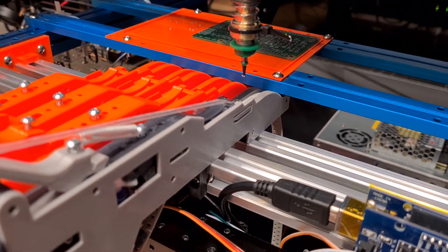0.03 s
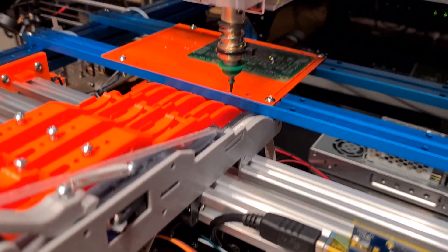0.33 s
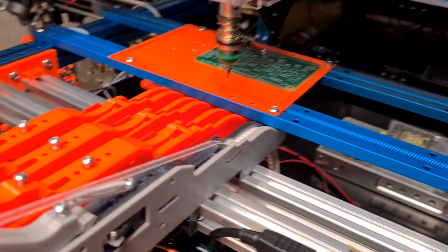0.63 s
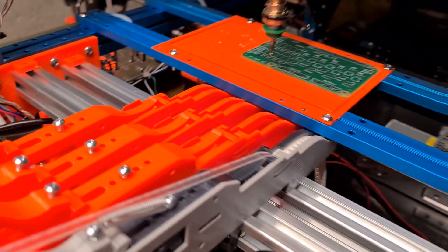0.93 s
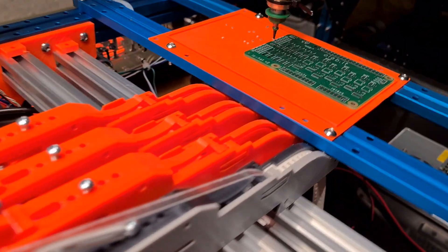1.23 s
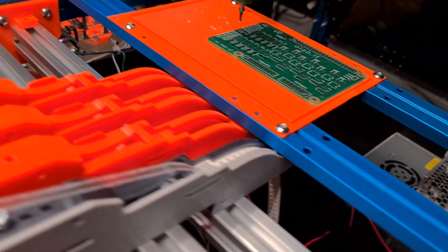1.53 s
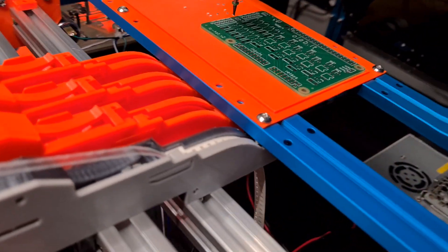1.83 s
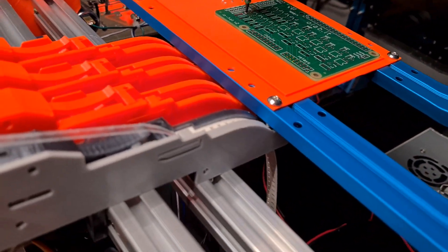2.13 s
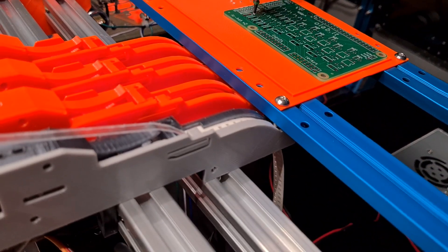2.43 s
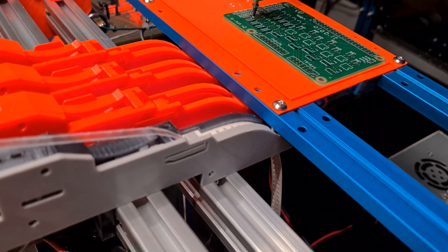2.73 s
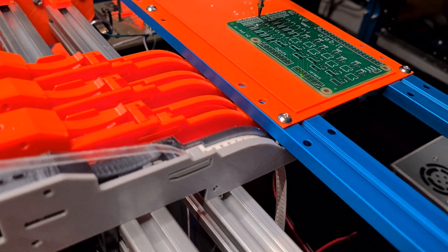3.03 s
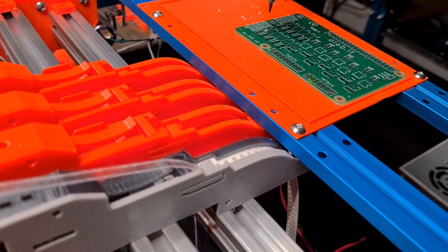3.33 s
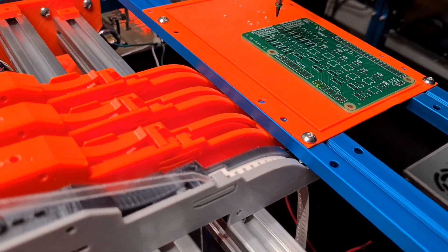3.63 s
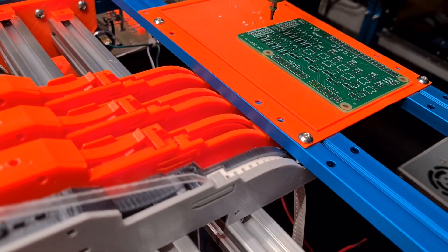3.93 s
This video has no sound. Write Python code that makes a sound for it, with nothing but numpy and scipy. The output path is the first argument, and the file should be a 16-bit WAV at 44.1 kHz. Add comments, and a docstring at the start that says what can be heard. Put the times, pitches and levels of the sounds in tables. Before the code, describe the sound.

Close up in a small room, a machine's vacuum pump runs with a low rattling buzz while a motor glides underneath. The pump suddenly stalls; fans hum softly, and a small drive rasps, whines and clicks.

```python
"""In a small room, a homemade pick-and-place machine is working close by.
Its vacuum pump thumps, rattles and puffs air with every stroke, then stalls and rocks on its mount.
A stepper motor glides the gantry (the moving bridge) along its rails. Twice, the gears of a small drive
on the head rasp and end in a click. Cooling fans hum underneath."""
import sys
import numpy as np
from scipy import signal
from scipy.fft import rfft, irfft
from scipy.io import wavfile

SR = 44100
rng = np.random.default_rng(int(sys.argv[2]) if len(sys.argv) > 2 else 0)


def int16_out(signal):
    """Quantize to a 16-bit WAV file."""
    q = np.round(np.clip(np.atleast_2d(signal).T, -1, 1) * 32767)
    wavfile.write(sys.argv[1], SR, q.astype(np.int16))


N = 176400
T = np.arange(N) / SR

# Each row: time in seconds, pump strokes per second.
PUMP_SPEED = [(0, 57.5), (.7, 57.63), (1.2, 57.68), (2.35, 57.66)]
# Each row: time in seconds, then thump, rattle and air levels in dB.
PUMP_LEVELS = [(0, -2.3, -1, -2), (.7, -2, -1, -3), (1.25, -1, -.5, -2), (1.6, 0, 0, -.5), (2.3, 0, 0, 0)]
# The pump stalls. Each row: time in seconds, thump level in dB, rattle and air level in dB.
LAST_STROKES = [(2.3626, -1, 1), (2.378, -14, -2), (2.3905, -4, -10), (2.4512, -13.5, -26)]
# Each row: multiple of the stroke rate, level in dB.
THUMP_COLOUR = [(1, -3), (2, -6), (3, -5), (4, -19), (5, -4), (6, -3), (7, -4), (8, -2), (9, -1), (10, -8),
                (11, -1), (12, 0), (13, -4), (14, -6), (15, -4), (16, -18), (17, -21), (18, -29), (19, -28)]
# Each row: pitch in Hz, dB before and dB after the listener moves, seconds to fade by 60 dB.
CASING_RINGS = [(1157, -6, -1, .08), (1212, -5, -5, .07), (1386, -2, -3, .08), (1499, 4, -9, .08),
                (1557, -7, -6, .07), (1789, -5, 0, .09), (1845, -9, -9, .06), (2019, -8, -1, .09),
                (2075, -8, -9, .06), (2249, -12, -7, .07), (2480, -14, -10, .05), (2940, -10, -6, .05),
                (3228, -10, -6, .06)]
# Each row: frequency in Hz, level of the puffed air in dB.
AIR_COLOUR = [(100, -9), (250, 0), (400, 8), (550, 7), (800, 10), (1000, -5), (1400, 1), (2000, 1),
              (2700, -3), (3300, 1.5), (4500, 1), (5100, -2), (6100, 4), (7300, -3), (8600, -12),
              (10000, -6), (11600, -2), (13500, -5), (15100, -1), (16000, -4)]
# Each row: start and end in seconds, level in dB, left minus right in dB.
GEAR_RUNS = [(-.06, .103, -21, -2), (3.503, 3.654, -22.3, -1.5)]
# The gears' first and second run. Each row: frequency in Hz, level in dB.
FIRST_RASP_COLOUR = [(400, -29), (1500, -16), (2600, -10), (3000, 4), (3250, 7), (3850, -2), (4300, 2),
                     (5000, -5), (6700, 3), (8200, -6), (10200, -2), (11500, -4), (14000, -3), (15800, -7)]
SECOND_RASP_COLOUR = [(150, -40), (400, -27), (900, -28), (1500, -21), (1900, -14), (2300, -14), (2700, -9),
                      (3050, 2), (3450, -3), (4000, -2.5), (5200, -5), (5950, 3), (6500, -2), (7400, -2),
                      (8200, -7), (9200, -3), (10400, -9), (11900, -3), (13200, -7), (15800, -10)]
# Each row: multiple of the whine's pitch, level in dB.
WHINE_TONES = [(1, -10), (2, -8), (3.03, 5.5), (3.96, -2), (5, -2), (6, -6)]
# Each row: time in seconds, level in dB.
STOP_CLICKS = [(.1032, 10), (3.7475, -4.5), (3.239, -48)]
# Each row: frequency in Hz, level in dB.
CLICK_COLOUR = [(300, -40), (1100, -24), (1800, -3), (2500, -8), (3400, 0), (4600, -7), (6400, 5),
                (8000, -7), (15000, -15)]
# Each row: multiple of the step rate, level in dB.
STEPPER_TONES = [(1, -3), (2, -1), (3, -10), (4, 2), (5, -8)]
# How well the frame carries sound. Each row: frequency in Hz, level in dB.
FRAME_COLOUR = [(30, -20), (75, -1), (120, -3), (180, -2), (270, 5), (400, -1), (520, -9), (630, -2),
                (900, -15)]
# Each row: start and length in seconds, pitch in Hz, level in dB.
MOTOR_HUMS = [(3.53, .06, 345, -58), (3.575, .055, 280, -52), (3.67, .17, 200, -51), (3.755, .06, 265, -54),
              (3.94, .08, 158, -51), (3.18, .14, 72, -62), (3.88, .14, 66, -63), (2.47, .075, 440, -53)]
# Each row: pitch in Hz, level in dB, seconds to fade by 60 dB.
FRAME_RINGS = [(610, 0, .07), (690, -5, .05), (1280, -8, .04), (1560, -9, .04)]
# Each row: pitch in Hz, level in dB.
WHIRR_TONES = [(2080, 0), (3060, 1), (4070, -2), (4850, -3), (5380, 0)]
# The fans' rush and their tones. Each row: frequency in Hz, level in dB.
FAN_COLOUR = [(15, -28), (25, -17), (50, -8), (81, -2), (146, -4), (231, -4), (330, -10), (488, -15),
              (700, -13), (900, -17), (1150, -12), (1450, -21), (2070, -24), (2400, -29), (3090, -27),
              (5420, -34), (8000, -42), (15000, -41)]
FAN_TONES = [(75.4, -75), (226.1, -78), (710.6, -82), (1017, -84), (1120, -82), (3036, -94), (5362, -102)]
# Each row: frequency in Hz, how alike the rush is in both ears from 0 to 1.
EAR_LIKENESS = [(50, .97), (400, .9), (1000, .5), (3000, .2), (15000, .1)]
# Each row: frequency in Hz, seconds for the room's echo to fade by 60 dB.
ROOM_FADE = [(100, .35), (700, .33), (3000, .3), (8000, .24), (15000, .19)]


def pump(first_s=.0013, off_s=2.35, stroke_hz=57.65):
    """Each stroke of the diaphragm, a flexing sheet, makes a thump, a rattle and a puff of air."""
    turns = np.cumsum(np.interp(T, *np.transpose(PUMP_SPEED))) / SR
    steady = first_s + np.interp(np.arange(np.interp(off_s, T, turns)), turns, T)
    when, thump_db, rattle_db, air_db = np.transpose(PUMP_LEVELS)
    last_s, last_thump_db, last_other_db = np.transpose(LAST_STROKES)
    times = np.r_[steady, last_s]

    def strokes(steady_db, last_db, spread_db, lag_s=0):
        db = np.r_[np.interp(steady, when, steady_db), last_db]
        return taps(times + lag_s, amp(db + spread_db * rng.standard_normal(len(times))))
    thump = pump_thump(strokes(thump_db, last_thump_db, spread_db=.35), stroke_hz)
    rattle = casing_rattle(strokes(rattle_db, last_other_db, spread_db=1.1, lag_s=.003))
    air = air_puffs(strokes(air_db, last_other_db, spread_db=1), stroke_hz)
    return room(thump + rattle, echo_db=-16) + room(air, echo_db=-7)


def pump_thump(strokes, stroke_hz, round_trip_s=.0058, passing=.86):
    """Most of each low thump passes at once; the hose throws the rest back."""
    body = [(k * stroke_hz, db) for k, db in THUMP_COLOUR]
    body = [(15, -35), (35, -16)] + body + [(1500, -36), (4000, -60)]
    thump = amp(1.9) * ring(strokes, colour(body))
    delay = np.zeros(round(round_trip_s * SR) - 1)
    return pan(-.6) * signal.lfilter(np.r_[passing, delay, 1], np.r_[1, delay, passing], thump)


def casing_rattle(strokes, move_s=(.8, 1.6), left_lag_radians=1.5):
    """The pump's casing rings on the right; its tone changes as the listener moves."""
    casing = sum(amp([[first], [later]]) * ping(hz, fade) for hz, first, later, fade in CASING_RINGS)
    before, after = ring(strokes, casing)
    moved = np.interp(T, move_s, [0, 1])
    rattle = before * (1 - moved) + after * moved
    ears = pan(-2) * np.exp([[-1j * left_lag_radians], [0]])
    return amp(-39) * (ears * signal.hilbert(rattle)).real


def air_puffs(strokes, stroke_hz, lag_s=.0004, puff_s=.005, leak=.35):
    """Air leaves the pump in quick hissing puffs, each with a slower leak."""
    t = np.maximum(T[:SR // 10] - lag_s, 0)
    puff = (t > 0) * (np.exp(-t / puff_s) + leak * np.exp(-t * stroke_hz / 2))
    hiss = ring(strokes, puff) * rng.standard_normal(N)
    return amp(-37) * ring(scatter(hiss), colour(AIR_COLOUR))


def head_drive():
    """The drive on the head rasps twice, whines after its second run and clicks at its stop."""
    rasps = gear_rasps()
    runs = sum(amp(db) * pan(side) * gate(start, end, .06, .014) * rasp
               for (start, end, db, side), rasp in zip(GEAR_RUNS, rasps))
    whine, hiss = holding_whine(rasps[1])
    return room(runs + hiss + stop_clicks(), echo_db=-11) + whine


def gear_rasps(hits_per_s=9000, turn_hz=65, throb_depth=.25, spread_db=3):
    """Gear teeth make many tiny hits that throb once a turn. Gives one rasp for each run."""
    hits = (rng.random(N) < hits_per_s / SR) * rng.choice([-1, 1], N)
    teeth = hits * amp(spread_db * np.minimum(rng.exponential(1, N), 5))
    throb = 1 + throb_depth * np.cos(angle(turn_hz * (1 + .08 * drift(20))))
    return [unit(ring(scatter(teeth * throb), colour(points)))
            for points in (FIRST_RASP_COLOUR, SECOND_RASP_COLOUR)]


def holding_whine(rasp, start=3.66, end=3.745, hz=2410, width_hz=50):
    """The motor holds still with a rough whine and a hiss."""
    def tone(k):
        phase = 2 * np.pi * k * hz * T
        return drift(width_hz * k) * np.sin(phase) + drift(width_hz * k) * np.cos(phase)
    tones = np.array([sum(amp(db) * tone(k) for k, db in WHINE_TONES) for ear in range(2)])
    whine = amp(-41.5) * gate(start, end, .015, .004) * tones
    hiss = amp(-40) * gate(start, end, .015, .008) * rasp
    return whine, hiss


def stop_clicks(fade_s=.0017):
    """The drive hits its end stop with a tiny burst of noise."""
    out = 0
    for start, db in STOP_CLICKS:
        crack = rng.standard_normal((2, SR // 20)) * np.exp(-T[:SR // 20] / fade_s)
        crack /= np.linalg.norm(crack, axis=1, keepdims=True)
        out += strike(start, db, ring(crack, colour(CLICK_COLOUR)))
    return out


def gantry(start=.14, length=1.19, top_step_hz=126, roughness=.55):
    """The stepper sings through the frame, speeding up then slowing, as wheels rumble on the rails."""
    speed = np.sin(np.pi * np.clip((T - start) / length, 0, 1))
    hz = top_step_hz * speed
    tones = sum(amp(db + read(FRAME_COLOUR, k * hz)) * (1 + roughness * drift(30)) * np.sin(k * angle(hz))
                for k, db in STEPPER_TONES)
    rumble = ring(rng.standard_normal(N), colour(FRAME_COLOUR + [(2000, -40), (6000, -60)]))
    return amp(-44) * np.sqrt(abs(speed)) * tones + amp(-42.5) * speed * rumble


def motor_hums():
    """Each small stepper move is a short hum that swells and fades."""
    out = 0
    for start, length, hz, db in MOTOR_HUMS:
        swell = np.sin(np.pi * np.clip((T - start) / length, 0, 1))
        out += amp(db) * swell * np.sin(angle(hz * (1 + .015 * drift(30))))
    return out


def knocks():
    """The stalled pump rocks on its mount, then the frame gives one soft knock."""
    mount = ping(hz=55, fade_s=.55)
    frame = sum(amp(db) * ping(hz, fade) for hz, db, fade in FRAME_RINGS)
    return strike(start=2.38, db=-39, sound=mount) + strike(start=2.798, db=-54, sound=frame)


def head_whirr():
    """The head's small motor sings faintly during the pause."""
    tones = sum(amp(db) * drift(70) * np.sin(2 * np.pi * hz * T) for hz, db in WHIRR_TONES)
    return amp(-84) * gate(2.98, 3.17, .02, .03) * tones


def fans(waver=.3):
    """Cooling fans make a soft rush of air with faint, wavering tones."""
    hz = np.fft.rfftfreq(N, 1 / SR)
    left, other = rfft(rng.standard_normal((2, N)))
    alike = read(EAR_LIKENESS, hz)
    right = alike * left + np.sqrt(1 - alike ** 2) * other
    rush = unit(irfft(np.array([left, right]) * amp(read(FAN_COLOUR, hz)), N))
    tones = sum(amp(db) * (1 + waver * drift(8)) * np.sin(2 * np.pi * f * T + drift(5))
                for f, db in FAN_TONES)
    return amp(-65.5 + .6 * drift(5)) * rush + tones


def scatter(x, smear_s=.002, size=512):
    """Nearby metal smears the sound differently for each ear, keeping its colour."""
    paths = rfft(rng.standard_normal((2, size)) * np.exp(-T[:size] / smear_s), 2 * size)
    paths = irfft(paths / abs(paths))[:, :size]
    return ring(x, paths / np.linalg.norm(paths, axis=1, keepdims=True))


def room(x, echo_db):
    """The room adds a short wash of echo whose high notes die first."""
    hz, t, noise = signal.stft(rng.standard_normal((2, SR // 2)), SR, nperseg=256)
    fade = np.exp(-np.log(1000) * t / read(ROOM_FADE, hz)[:, None])
    tail = signal.istft(noise * fade, SR, nperseg=256)[1]
    tail *= np.minimum(T[:tail.shape[1]] / .008, 1)
    return x + amp(echo_db) * ring(x, tail / np.linalg.norm(tail[0]))


def amp(db):
    return 10 ** (np.asarray(db) / 20)


def unit(x):
    return x / np.sqrt(np.mean(x ** 2) + 1e-20)


def angle(hz):
    return 2 * np.pi * np.cumsum(hz) / SR


def read(points, hz):
    """Looks up a table between its frequencies."""
    f, value = np.transpose(points)
    return np.interp(np.log(hz + 1), np.log(f + 1), value)


def pan(left_db):
    return amp(np.array([[left_db], [-left_db]]) / 2)


def gate(start, end, rise_s, fall_s):
    return np.clip((T - start) / rise_s, 0, 1) * np.exp(-np.maximum(T - end, 0) / fall_s)


def ring(x, response):
    """Lets every sample of x set off the response."""
    return signal.fftconvolve(np.atleast_2d(x), np.atleast_2d(response), axes=1)[:, :N]


def colour(points, size=8192):
    """A short response with the given colour: its mix of lows and highs."""
    log_gain = np.log(amp(read(points, abs(np.fft.fftfreq(size, 1 / SR)))))
    response = np.fft.ifft(np.exp(np.conj(signal.hilbert(log_gain)))).real[:size // 2]
    return response / np.linalg.norm(response)


def taps(times, sizes):
    """One-sample spikes at the given times."""
    return np.bincount(np.clip(np.round(np.asarray(times) * SR).astype(int), 0, N - 1), sizes, N)


def strike(start, db, sound):
    return ring(taps([start], [amp(db)]), sound)


def drift(hz, size=4096):
    """A random wobble, up to about the given rate."""
    f = np.fft.rfftfreq(size, N / SR / size)
    slow = unit(irfft(rfft(rng.standard_normal(size)) * np.exp(-(f / hz) ** 2)))
    return np.interp(T, np.linspace(0, N / SR, size), slow)


def ping(hz, fade_s):
    """A tone that falls by 60 dB in fade_s."""
    return np.sin(2 * np.pi * hz * T[:SR]) * np.exp(-np.log(1000) * T[:SR] / fade_s)


def scene():
    return pump() + knocks() + gantry() + motor_hums() + head_drive() + head_whirr() + fans()


def record(dry, top_hz=15900):
    """Cuts off the very highest treble."""
    return signal.oaconvolve(dry, signal.firwin(511, top_hz, window=("kaiser", 9), fs=SR)[None], "same")


dry = scene()
out = record(dry)
int16_out(out)
```